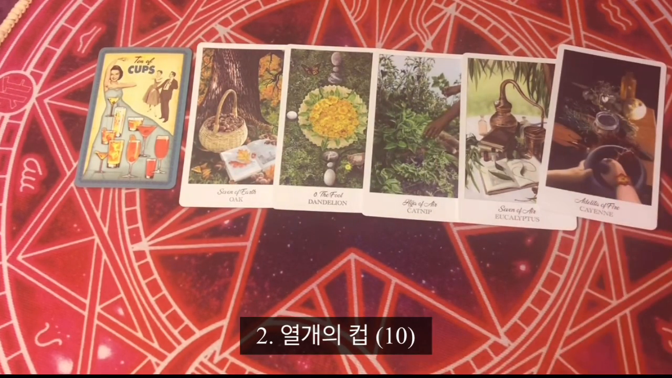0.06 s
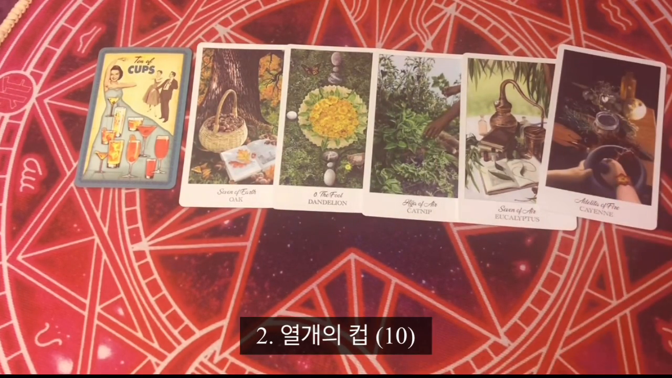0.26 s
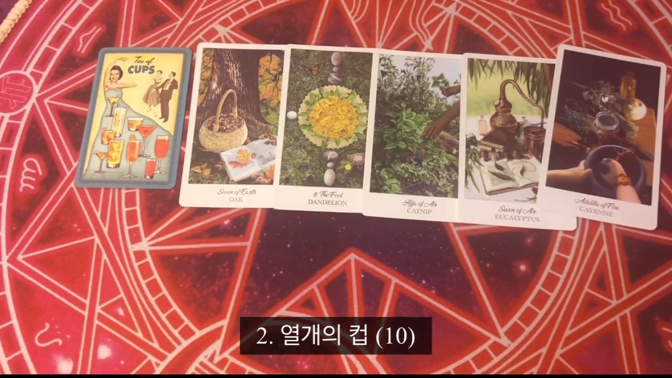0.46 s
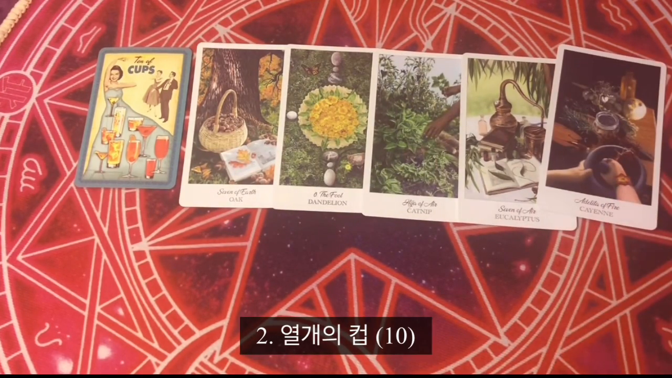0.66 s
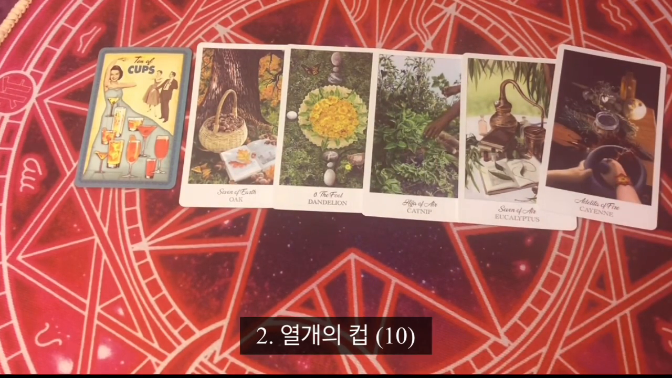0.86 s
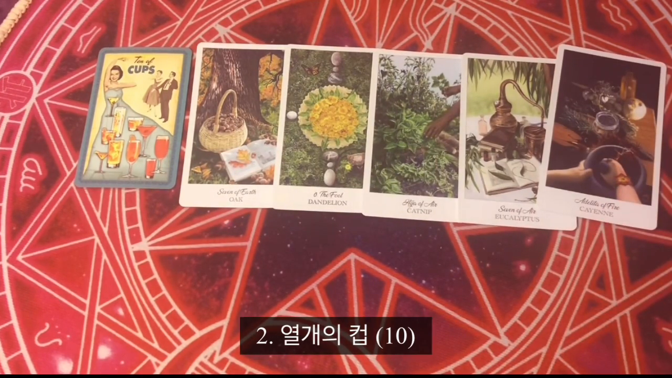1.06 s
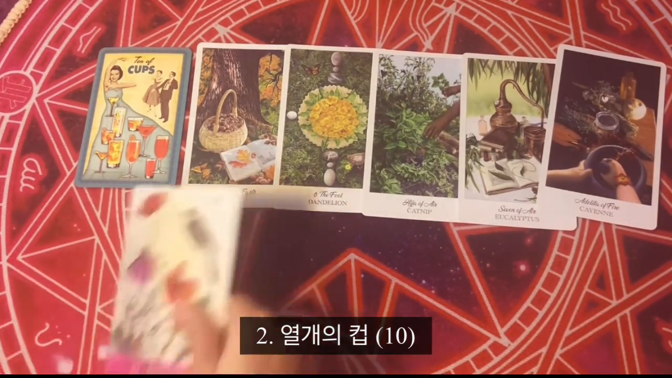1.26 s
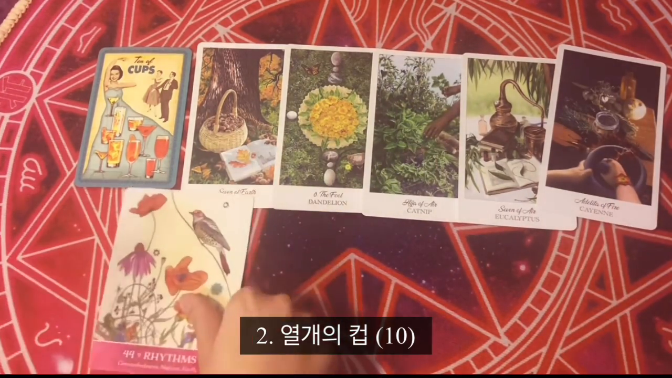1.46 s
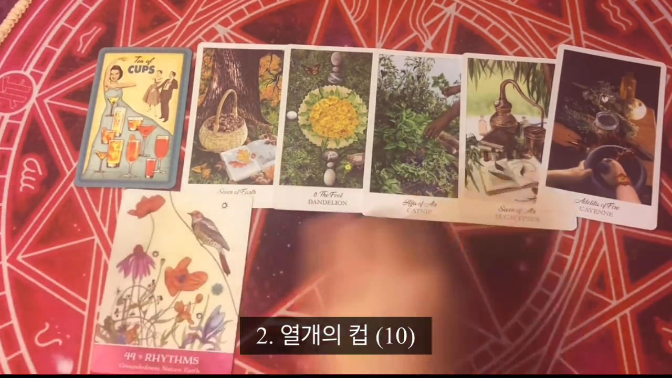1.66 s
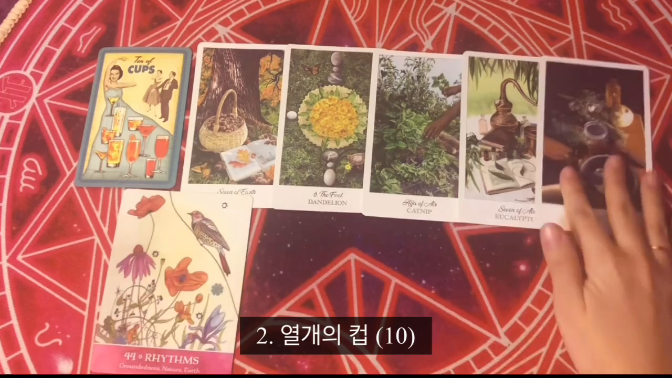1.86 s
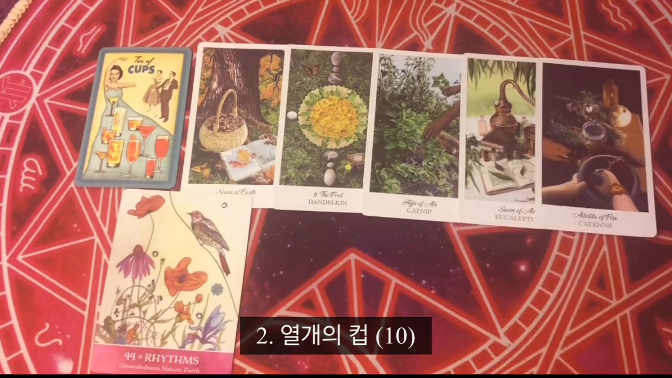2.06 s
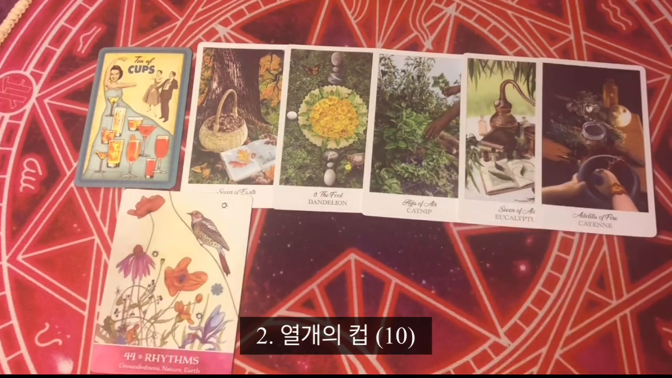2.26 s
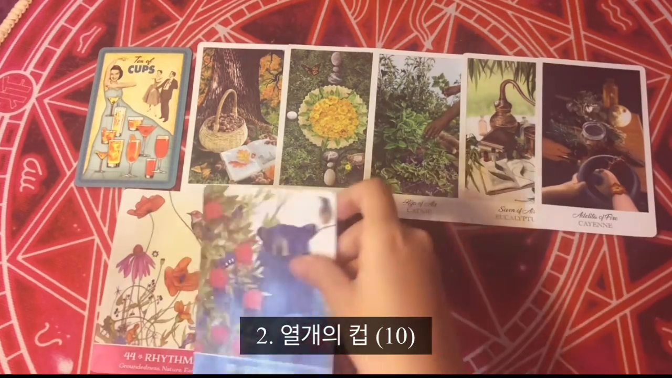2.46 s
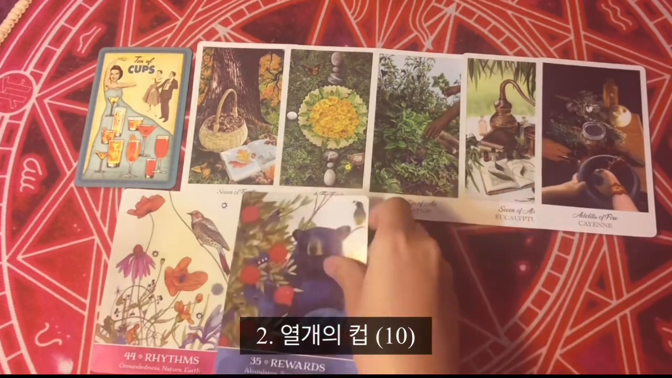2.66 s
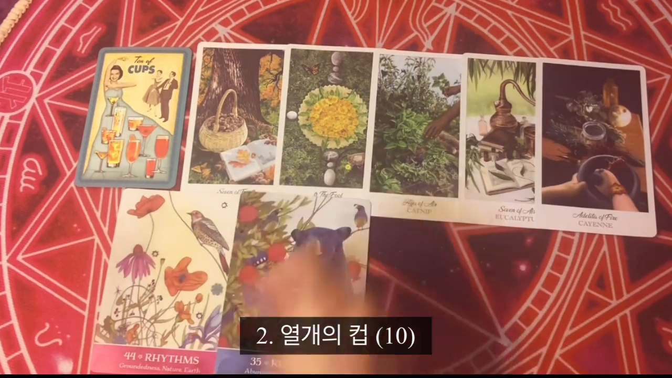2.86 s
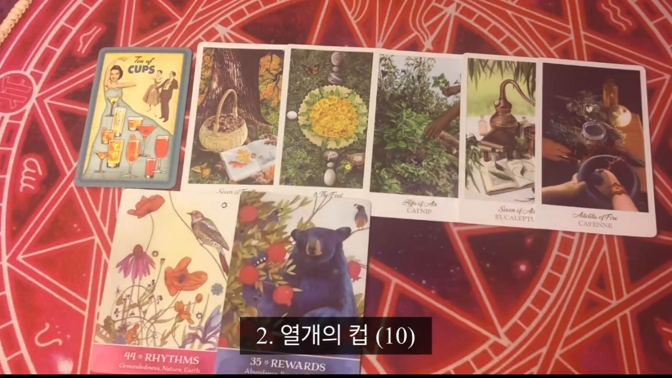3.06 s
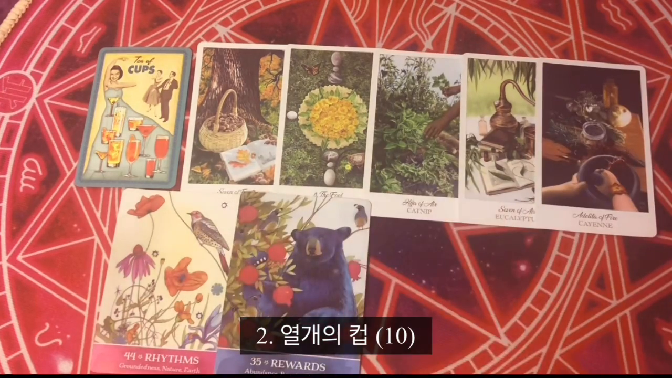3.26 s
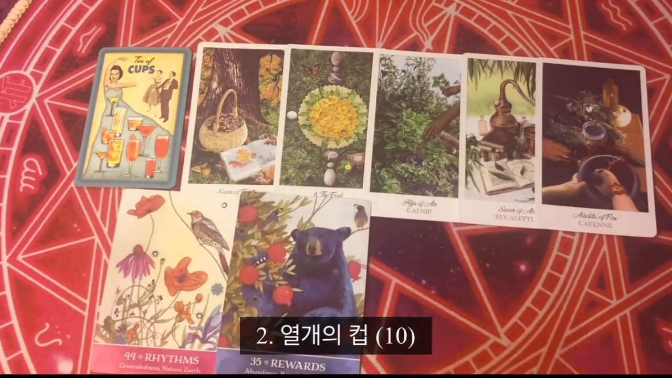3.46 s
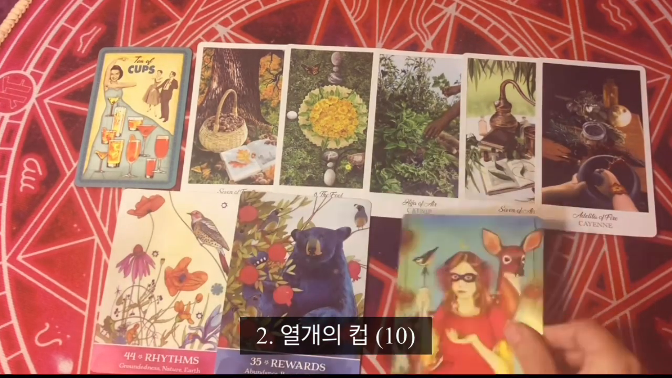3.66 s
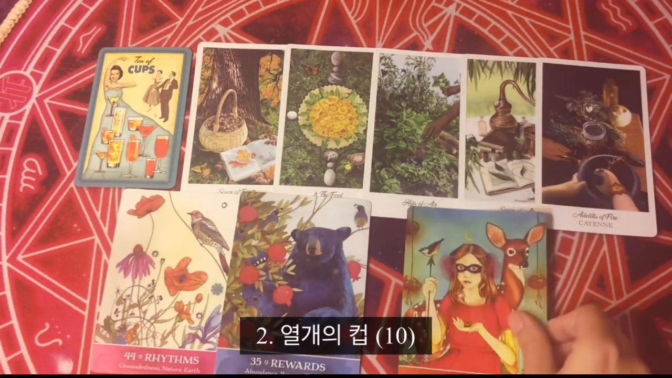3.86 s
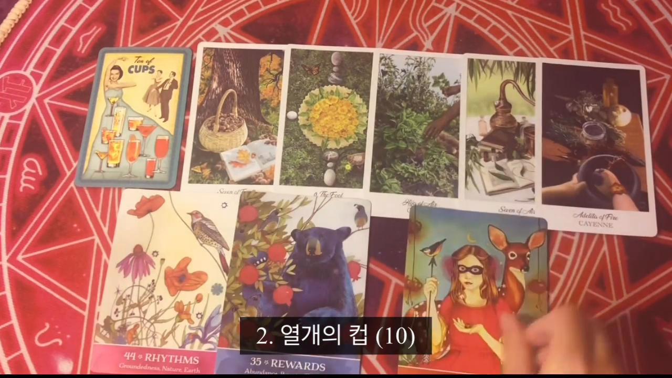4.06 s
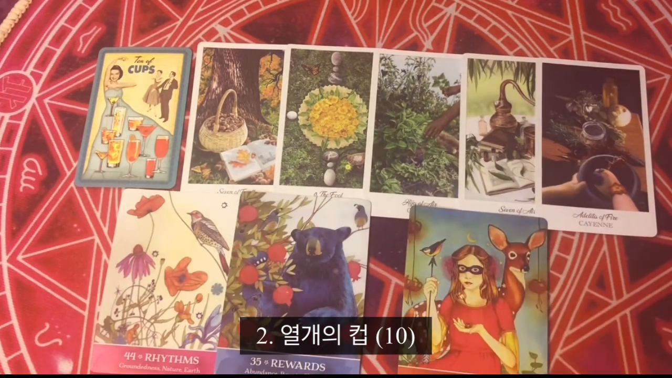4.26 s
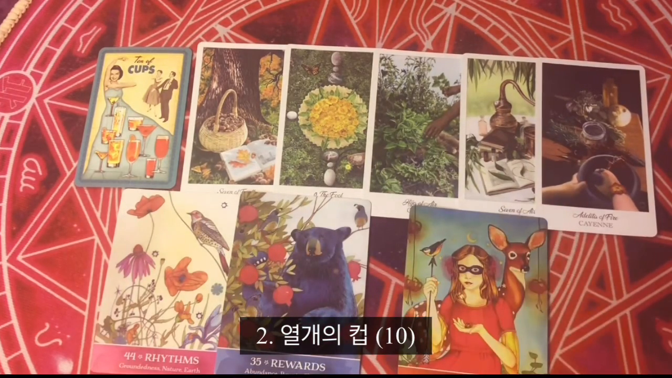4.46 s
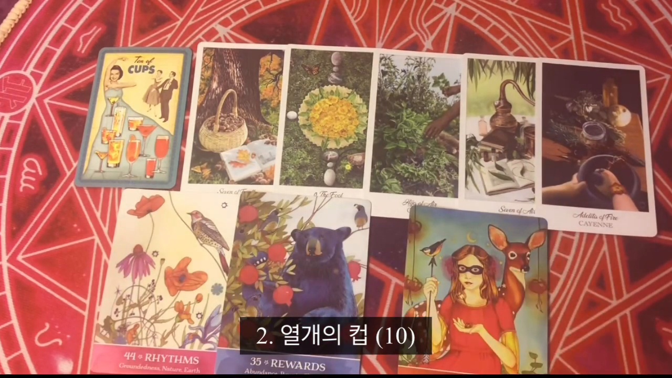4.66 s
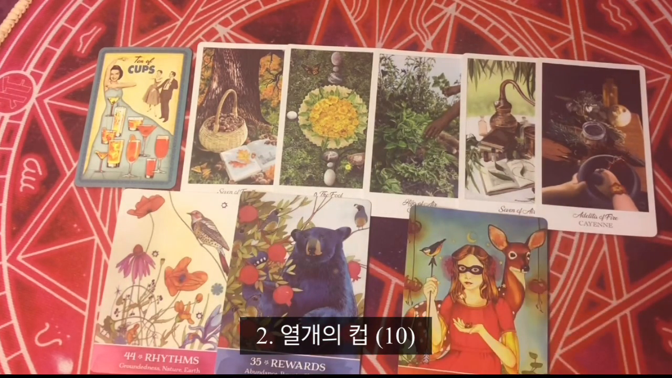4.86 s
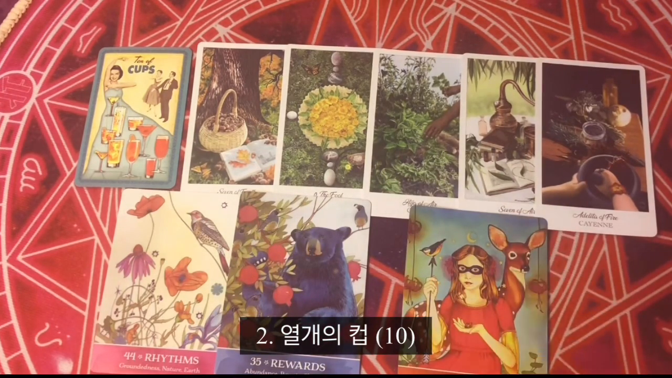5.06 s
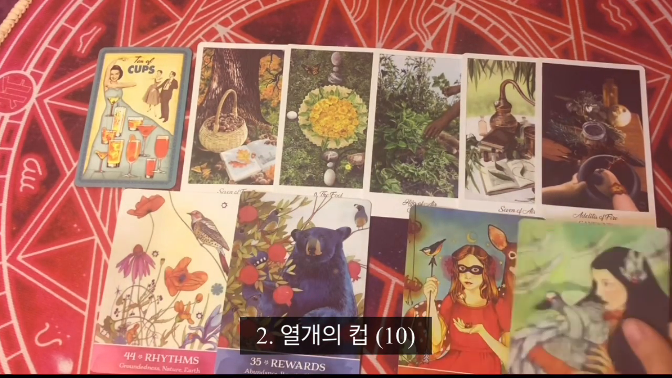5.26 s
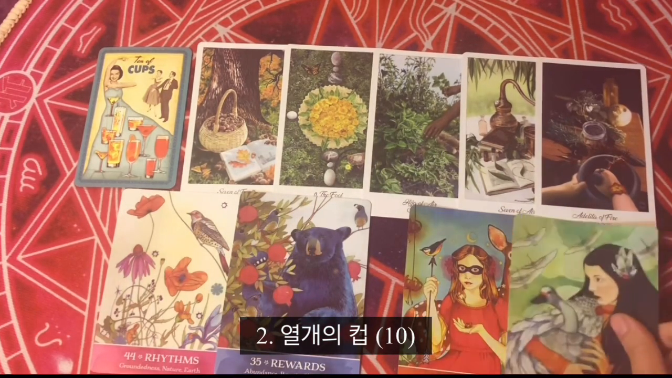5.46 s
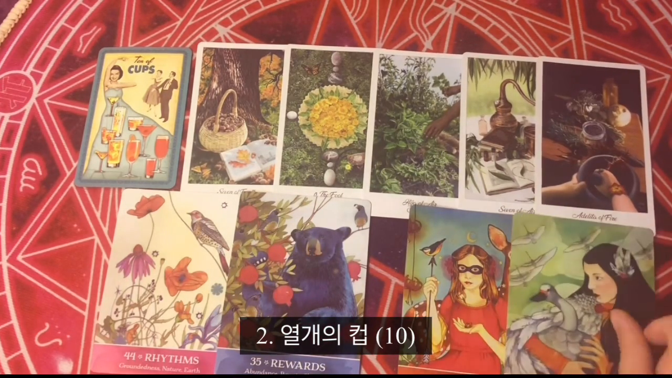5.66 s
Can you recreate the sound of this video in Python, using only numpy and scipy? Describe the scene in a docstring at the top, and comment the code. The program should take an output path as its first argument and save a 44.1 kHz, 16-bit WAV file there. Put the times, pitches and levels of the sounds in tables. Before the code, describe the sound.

Close, dry card handling in a small quiet room: irregular slaps of card stock, sliding rustle, edge flicks and fingers rubbing.

```python
"""Large cards land one by one on a cloth-covered table, close by: the sheet rings briefly, the table knocks.
Between landings, card hisses over card (grainy filtered noise), edges tick in the hand (rung resonances),
fingers rub softly, the coating squeaks (unsteady tones) and the hand bumps the table (low sine bursts).
One bowed card creaks and scrapes flat. The room is small and dry, with a low hum and a faint hiss."""
import sys
import numpy as np
from scipy import signal
from scipy.fft import rfft, irfft
from scipy.io import wavfile
from scipy.ndimage import uniform_filter1d

SR = 44100
rng = np.random.default_rng(int(sys.argv[2]) if len(sys.argv) > 2 else 0)


def unload_wav(signal):
    """Save mono or channel-first audio to the path in sys.argv[1] as 16-bit WAV at rate SR, clipped to [-1, 1]."""
    wavfile.write(
        sys.argv[1],
        SR,
        np.round(np.clip(np.atleast_2d(signal).T, -1, 1) * 32767).astype(np.int16),
    )


N = 251811
TIME = np.arange(N) / SR


def amp(db):
    """Decibels to gain."""
    return 10 ** (np.asarray(db) / 20)


def unit(x):
    """Scales to energy 1."""
    return x / np.sqrt(np.sum(x ** 2) + 1e-20)


def evened(x):
    """Scales to rms 1."""
    return unit(x) * np.sqrt(len(x))


def add(mix, s, sound):
    """Mixes a sound in at time s."""
    part = mix[max(round(s * SR), 0):][:len(sound)]
    part += sound[:len(part)]


def band(x, lo_hz, hi_hz, order=2):
    """Causal band-pass."""
    edges_hz = [lo_hz, min(hi_hz, SR / 2 - 1)]
    return signal.sosfilt(signal.butter(order, edges_hz, "band", fs=SR, output="sos"), x)


def ring(x, hz, width_hz):
    """One-pole complex resonance; hz is fixed or a curve."""
    turn = np.exp(2j * np.pi * np.cumsum(hz * np.ones(len(x))) / SR)
    r = np.exp(-np.pi * width_hz / SR)
    return (turn * signal.lfilter([1 - r], [1, -r], x / turn)).imag


def coloured(x, points):
    """Shapes the spectrum of an N-sample noise, at rms 1."""
    hz, db = np.transpose(points)
    bins_hz = np.fft.rfftfreq(N, 1 / SR)
    gain = amp(np.interp(np.log(bins_hz + 1), np.log(hz), db))
    return evened(irfft(rfft(x) * gain, N))


def wobble(length, size):
    """Random curve of rms 1, smoothed twice over size samples."""
    return evened(uniform_filter1d(uniform_filter1d(rng.standard_normal(length), size), size))


def swell(t, rise, fall):
    """Exponential growth up to t = 0, then decay; time constants in seconds."""
    return np.exp(np.where(t < 0, t / max(rise, 1e-5), -t / max(fall, 1e-5)))


def decaying_sine(t, hz, t60):
    """A mode struck at t = 0, falling 60 dB in t60 seconds."""
    return amp(-60 * t / t60) * np.sin(2 * np.pi * hz * t)


def background():
    """Steady air whose low part swells a little, and a wavering hum of noise-driven resonances."""
    # Room air colour. Each row: frequency in Hz, relative level in dB per Hz.
    air_colour = [(25, 4.5), (50, -8), (68, -10), (95, -0.5), (125, -2), (160, -3), (230, 2), (330, -6.5),
                  (480, -7.5), (700, -9), (1000, -13), (2500, -22.5), (6000, -27.5), (15800, -29.5)]
    # Hum lines. Each row: frequency in Hz, nominal width in Hz, level in dB.
    hum_lines = [(85.4, 4.4, -58), (170.4, 2.03, -63.5), (221, 12.5, -68.5)]
    air_db = -55.5
    air = amp(air_db) * coloured(rng.standard_normal(N), air_colour)
    low = signal.sosfiltfilt(signal.butter(2, 900, fs=SR, output="sos"), air)
    out = air + low * (amp(0.94 * wobble(N, size=3500)) - 1)
    for hz, width_hz, db in hum_lines:
        # two resonances in series, each twice as wide
        wavering = ring(ring(rng.standard_normal(N), hz, 2 * width_hz), hz, 2 * width_hz)
        out += amp(db) * evened(band(wavering, 0.853 * hz, 1.283 * hz))
    return out


def handling():
    """Strength of the fingers' rubbing: each hold sets in, stays and dies away over a resting level."""
    # Fingers hold and shift a card. Each row: start in seconds, length in seconds, level in dB.
    holds = [(0.198, 0.085, -74), (0.704, 0.057, -71), (2.004, 0.17, -73.5), (2.356, 0.1, -64),
             (2.71, 0.65, -76.5), (3.566, 0.44, -71.5), (4.254, 0.1, -66.5), (4.623, 0.45, -73.5),
             (5.023, .36, -66.5)]
    grip_s, let_go_s, resting_db = 0.031, 0.038, -85.5
    level = amp(resting_db) * np.ones(N)
    for start, length, db in holds:
        level += amp(db) * swell(TIME - np.clip(TIME, start, start + length), grip_s, let_go_s)
    return level


def flecks(lo_hz, hi_hz, per_s=700, spread_db=4.0, width_hz=150, count=12):
    """Tiny catches of the card's edge, each ringing one mode of the sheet."""
    out = np.zeros(N)
    for hz in np.geomspace(lo_hz, hi_hz, count):
        happens = rng.random(N) < per_s / count / SR
        catches = happens * amp(spread_db * np.minimum(rng.exponential(1, N), 3))
        out += ring(catches, hz * rng.uniform(0.93, 1.04), width_hz)
    return evened(band(out, 0.6 * lo_hz, 1.7 * hi_hz))


def slides():
    """Card rubs on card: grainy hiss and fizz from the surfaces, lower rustle and crackle from the sheet."""
    # Each row: time of fastest motion in seconds, hiss level in dB, brightness in dB,
    # speeding-up time constant in seconds, nominal slowing-down time constant in seconds.
    slide_moves = [(.781, -55, 4, 0.0079, .006), (.89, -63, 10, 0.026, .035),
                   (0.975, -41.5, 11, 0.02, 0.031), (.996, -42, 30, 0.0022, 0.0029),
                   (1.151, -59.5, -10.5, 0.0043, 0.053), (1.335, -60.5, -5.5, 0.056, 0.09),
                   (1.689, -62.5, -3.5, 0.0094, 0.097), (1.92, -63, 5, .016, .024),
                   (2.133, -52.5, 15, 0.0073, 0.013), (2.176, -54.5, -5.5, .016, 0.023),
                   (2.55, -69.5, -12, 0.067, 0.09), (2.655, -54, -6.5, 0.026, 0.014),
                   (2.887, -59.5, -1.5, 0.0097, 0.01), (3.033, -62.5, 2, 0.015, 0.029),
                   (3.206, -47, 8, 0.017, .018), (3.49, -66, -10.5, 0.017, 0.071),
                   (4.299, -58, 9, 0.017, 0.011), (4.325, -60.5, 17, 0.0087, 0.0096),
                   (4.346, -61, -2, 0.015, 0.099), (4.62, -54, 1, 0.0066, 0.019),
                   (4.673, -52, -0.5, 0.0085, 0.0082), (5.181, -64.5, -14.5, 0.021, .01),
                   (5.441, -55, -14.5, 0.015, 0.014)]
    # Colours of the sheet, its surface and its finest fibres.
    # Each row: frequency in Hz, relative level in dB per Hz.
    sheet_colour = [(300, -2), (900, -3.5), (1500, -3), (2200, 0.5), (3300, -2.5), (4500, -20), (8000, -14),
                    (16000, -48)]
    surface_colour = [(500, -25), (2000, -8), (4000, 3), (6000, 1.5), (8500, -11), (11000, -3),
                      (16000, -11)]
    fizz_colour = [(2000, -41), (7000, -3.5), (9500, -1), (12000, -5), (15000, -2.5), (16500, -9)]
    # a bright slide trades rustle for fizz (dB per dB of brightness)
    sheet_loss, fizz_gain, fizz_db = 0.79, 0.42, -1.5
    levels = np.zeros((3, N))
    for s, db, bright_db, rise, fall in slide_moves:
        # friction brings the card to rest
        stopping = np.exp(-(np.maximum(TIME - s, 0) / (2.3 * max(fall, .001))) ** 2)
        layers = amp([[db - sheet_loss * bright_db], [db], [db + fizz_db + fizz_gain * bright_db]])
        levels += layers * swell(TIME - s, rise, fall) * stopping
    rubbing = handling()
    # fibres catch and slip
    catch = amp(2.0 * wobble(N, size=200) + 1.9 * wobble(N, size=14))
    sheet = coloured(catch * rng.standard_normal(N), sheet_colour)
    hiss = coloured(catch * rng.standard_normal(N), surface_colour)
    fizz = coloured(catch * rng.standard_normal(N), fizz_colour)
    sheet = evened(sheet + 1.2 * flecks(1390, 3880, per_s=420))
    hiss = evened(hiss + 0.66 * flecks(4010, 8680, per_s=550))
    out = sheet * (levels[0] + rubbing)
    out += hiss * (levels[1] + 0.61 * rubbing)
    return out + fizz * (levels[2] + .5 * rubbing)


def tap(low_hz, low_db, high_hz, high_db, bite_db, crack_db, grit_db, knock_hz, knock_db, drag):
    """A card's edge drags over fibres and lets go; the sheet rings for a few cycles and pushes on the table."""
    # Higher card modes, the crack. Each row: multiple of high bending mode, width in Hz, relative level in dB.
    overtones = [(2.1, 260, -1), (2.45, 304, 1.5), (2.85, 347, 0.5), (3.3, 400, 0)]
    # Table modes, wherever it is struck. Each row: frequency in Hz, relative level in dB, t60 in seconds.
    table_modes = [(287.5, -2, 0.1), (400, -3, 0.051), (542, 1.5, 0.031), (648, -1.5, 0.048),
                   (917, -16.5, 0.035)]
    t = (np.arange(SR // 4) - SR // 100) / SR
    release, after = 1. * (t == 0), np.maximum(t, 0)
    # a gritty contact scrapes before it lets go; a dull one lands at once and rattles afterwards
    lead_share = np.clip((grit_db - high_db + 22.5) / 18, .12, 1.2)
    fibres = rng.standard_normal(len(t)) * amp(1.26 * wobble(len(t), size=12))
    dragging = swell(t, 1.78 * drag * lead_share, 1.6 * drag)
    dragging += 0.017 * swell(t, 0.0029 * lead_share, 0.0017)
    scrape = unit(fibres * dragging)
    drive = release + scrape * min(drag / 0.00042, .9 + 1.2 * lead_share)

    bend = amp(low_db) * unit(band(ring(drive, low_hz, 226), 620, 2140))
    bend += amp(high_db) * unit(band(ring(drive, high_hz, 247), 1270, 3400))
    bite_hz = 3150 * rng.uniform(0.89, 0.996)
    bite = amp(bite_db) * unit(band(ring(drive, bite_hz, 400), 2970, 4060))
    higher = sum(amp(db) * ring(drive, high_hz * ratio, width_hz) for ratio, width_hz, db in overtones)
    crack = amp(crack_db) * unit(band(unit(higher) + 0.065 * unit(drive), 4500, 9000))
    grit = amp(grit_db) * unit(band(scrape + 0.43 * release, 5040, 14900))

    # the table knocks, favouring one pitch at the spot that is struck
    spot = unit(decaying_sine(after, knock_hz, t60=0.052))
    board = unit(sum(amp(db) * decaying_sine(after, hz, t60) for hz, db, t60 in table_modes))
    knock = amp(knock_db) * unit(spot + 0.86 * board)
    # the whole table top rings on, the more the harder it is pushed
    push = amp(knock_db - 14.0) + amp(low_db - 15.5)
    top = push * unit(decaying_sine(after, 222, t60=.2))
    return t[0], bend + bite + crack + grit + knock + top


def touch(s, db, bright_db, grit_db, low_hz, high_hz, knock_db, knock_hz, drag, voice):
    """One contact: strength lifts the card's modes together, brightness tilts them by the voice's slopes."""
    low_db, high_db, bite_db, crack_db = (db + offset + slope * bright_db for offset, slope in voice)
    lead, sound = tap(low_hz, low_db, high_hz, high_db, bite_db, crack_db, grit_db, knock_hz, knock_db, drag)
    return s + lead, sound


def tick(s, db, bright_db, hz, drag):
    """A contact held off the table: low mode a fixed share of the high one, little reaching the cloth."""
    # Rows low bend, high bend, bite, crack. Each row: dB against strength, dB per dB of brightness.
    tick_voice = [(-3.5, 0.081), (.5, 0), (-3.5, 0.38), (-8.5, 1)]
    low_ratio, knock_rel_db, knock_hz = .68, -13, 370
    grit_rel_db, grit_slope = -10, 1.03  # dB against strength, dB per dB of brightness
    grit_db = db + grit_rel_db + grit_slope * bright_db
    return touch(s, db, bright_db, grit_db, low_ratio * hz, hz, db + knock_rel_db, knock_hz, drag, tick_voice)


def strays(count=40):
    """Faint ticks at random times, stronger the harder the fingers rub."""
    peak_db, spread_db, bright_db = -35.5, 2.5, 3  # peak_db at the hardest rubbing, mid spread
    centre_hz, drag_s = 2050, .0012
    out, rubbing = np.zeros(N), handling()
    for place, size, pitch in rng.random((count, 3)):
        at = int(place * N)
        db = peak_db + spread_db * (2 * size - 1) + 20 * np.log10(rubbing[at] / rubbing.max())
        hz = centre_hz * 2 ** ((pitch - .5) / 2)
        add(out, *tick(at / SR, db, bright_db, hz, drag_s))
    return out


def landings():
    """Cards land: the edge drags and lets go, the sheet rings and knocks the table."""
    # Each row: time in seconds, strength in dB, brightness in dB, edge grit in dB, low bending mode in Hz,
    # high bending mode in Hz, knock level in dB, knock pitch in Hz, nominal edge drag in seconds.
    landing_rows = [(.189, -27, 6, -31, 875, 1670, -16, 777, 0.0015),
                    (0.1935, -27, -4, -44, 1420, 1680, -20.5, 660, 0.0059),
                    (1.141, -17.5, -6, -41, 1060, 1980, -20.5, 403, .0034),
                    (1.1525, -30, -3, -46, 1023, 2120, -30, 364, 0.0024),
                    (1.3687, -9.5, -2, -16, 1110, 1830, -15.5, 604, 0.0014),
                    (2.1734, -25.5, 9, -30, 1290, 2500, -20.5, 300, .0009),
                    (2.3346, -10.5, 5.5, -20, 1460, 2400, -16.5, 680, 0.00065),
                    (2.3378, -12.5, -7, -27, 1060, 1910, -15, 374, 0.00047),
                    (2.5781, -14, 7.5, -23.5, 1120, 1840, -31, 315, .0012),
                    (2.6338, -3.5, 6.5, -5, 1100, 2180, -13.5, 405, .0009),
                    (2.6353, -8.5, -6, -22, 1330, 2360, -23, 850, .00065),
                    (3.416, -30, 2.5, -42, 1130, 1870, -24, 680, 0.0028),
                    (3.459, -14, -7, -43, 1130, 2420, -12, 380, 0.0012),
                    (3.4653, -19.5, -15, -50, 1240, 1770, -14.5, 608, 0.0042),
                    (3.845, 6.5, 2, -10, 1800, 1944, -16, 481, .0005),
                    (3.8474, -5.5, -6, -14, 1620, 1820, -20.5, 460, 0.00068),
                    (5.086, -20.5, 5, -29, 1310, 1650, -25.5, 450, 0.0011),
                    (5.1104, -21.5, -7, -46, 1238, 1790, -15.5, 565, 0.005),
                    (5.427, -6, 3.5, -8, 1820, 1720, -7.5, 725, 0.00071),
                    (5.4354, -18, 9, -16, 1310, 2030, -10, 653, 0.0016)]
    # Rows low bend, high bend, bite, crack. Each row: dB against strength, dB per dB of brightness.
    landing_voice = [(-1.5, -0.11), (1, 0), (-6.5, 0.66), (-9, 0.92)]
    out = np.zeros(N)
    for row in landing_rows:
        add(out, *touch(*row, landing_voice))
    return out


def ticks():
    """A card's edge flicks off a finger or another card and rings the sheet."""
    # Each row: time in seconds, strength in dB, brightness in dB, high bending mode in Hz,
    # nominal edge drag in seconds.
    tick_rows = [(0.253, -40, 8, 1965, .002), (0.333, -40.5, 13, 1860, 0.0009),
                 (0.7011, -36, 14.5, 2300, 0.001), (0.9944, -17, -7, 2440, 0.0038),
                 (1.173, -32, -9, 2143, .0026), (1.215, -21.5, -6.5, 2110, 0.0049),
                 (1.4365, -22.5, 2, 1900, 0.0006), (2.097, -33, 12, 1770, 0.0017),
                 (2.323, -27, 1, 2304, 0.0022), (2.395, -27, -6, 2100, 0.0025),
                 (2.4274, -16.5, -7, 2220, 0.0024), (2.506, -25.5, -1, 1810, 0.0048),
                 (3.5204, -30.5, -10, 2300, .0018), (3.5996, -28.5, -1, 2260, 0.0023),
                 (3.6873, -30, 2, 2380, 0.00047), (3.716, -25, -2, 2700, 0.0033),
                 (3.9361, -20.5, 1, 2020, 0.00068), (4.132, -32.5, 4.5, 2530, .002),
                 (4.3413, -36.5, 15, 1670, .0012), (4.7707, -43, 14.5, 1720, 0.0011),
                 (4.873, -36.5, 13, 1720, 0.00062), (4.9004, -34, 9, 2520, .0024),
                 (4.9703, -45, 19, 2430, 0.0025), (5.003, -32, 8, 2700, .0024),
                 (5.142, -23, 2.5, 1800, 0.0014), (5.2272, -24.5, -6.5, 1810, 0.0018),
                 (5.2894, -23, 6, 1780, 0.00073), (5.3071, -21.5, 5, 1841, 0.0023),
                 (5.405, -21, 4.5, 1710, 0.012), (5.537, -29.5, 6, 1760, 0.0036)]
    out = np.zeros(N)
    for row in tick_rows:
        add(out, *tick(*row))
    return out


def bumps():
    """The heel of the hand sets the table's lowest mode going: soft sine bursts."""
    # Each row: centre time in seconds, peak level in dB, frequency in Hz, length in seconds.
    bump_rows = [(2.027, -50, 119, 0.078), (3.402, -44, 82.4, .1), (4.971, -47.5, 120.7, 0.11),
                 (5.188, -46, 113.7, 0.17)]
    out = np.zeros(N)
    for s, db, hz, length in bump_rows:
        t = np.arange(round(length * SR)) / SR
        tone = np.sin(2 * np.pi * (hz * t + rng.random()))
        add(out, s - length / 2, amp(db) * np.hanning(len(t)) * tone)
    return out


def settle(s=3.848, db=-40.5, start_hz=2450, end_hz=1600, fade=0.025, rub_db=-3, low_db=-5, creak_db=-33):
    """The most bowed card creaks just before it snaps, then flattens with a scrape of falling pitch."""
    t = np.arange(SR // 8) / SR
    hz = np.interp(t, [0, .052], [start_hz, end_hz])
    upper = evened(band(ring(rng.standard_normal(len(t)), hz, 294), 960, 4050))
    lower = evened(band(ring(rng.standard_normal(len(t)), 1380, 260), 810, 2200))
    rub = evened(band(band(rng.standard_normal(len(t)), 1200, 4300, order=1), 670, 7400))
    scrape = upper + amp(low_db) * lower + amp(rub_db) * rub
    motion_left = np.interp(t, [.044, .062], [1, 0])
    out = np.zeros(N)
    add(out, s - .0095, amp(creak_db) * rub[::-1] * swell(t - .0055, 0.0043, 0.002))
    add(out, s, amp(db) * scrape * swell(t - .008, .006, fade) * motion_left)
    return out


def squeaks(wander_hz=110, octave=0.69):
    """Brief stick-slip of the coating as a card leaves the deck: an unsteady tone and its octave."""
    # Each row: peak time in seconds, nominal level in dB, mean frequency in Hz, fade time constant in seconds.
    squeak_rows = [(4.342, -45.5, 2920, 0.004), (4.366, -62, 2900, .008), (4.389, -58, 2830, 0.011),
                   (4.677, -54, 3310, 0.0072)]
    t, out = np.arange(SR // 8) / SR, np.zeros(N)
    for s, db, hz, fade in squeak_rows:
        phase = 2 * np.pi * np.cumsum(hz + wander_hz * wobble(len(t), size=30)) / SR
        tone = np.sin(phase) + octave * np.sin(2 * phase)
        tone *= amp(3.3 * wobble(len(t), size=90))
        add(out, s - 1 / 50, amp(db) * tone * swell(t - 1 / 50, .003, fade))
    return out


def room(x):
    """A few near reflections, then sparse echoes, each band dying at its own speed."""
    # Reverberation bands. Each row: low edge in Hz, high edge in Hz, t60 in seconds, level in dB.
    reverb_bands = [(130, 450, 0.18, -6), (683, 2440, .13, -11), (3150, 11000, 0.11, -13.5)]
    # First reflections from things near the table. Each row: delay in seconds, linear gain.
    near_echoes = [(.0031, 0.099), (.0068, 0.038)]
    t = np.arange(SR // 2) / SR
    echoes = rng.standard_normal(len(t)) * (rng.random(len(t)) < 2500 / SR) * (t > .004)
    tail = np.zeros(len(t))
    for lo, hi, t60, db in reverb_bands:
        width_gain = np.sqrt(2 * abs(hi - lo) / SR)
        tail += amp(db) * width_gain * unit(band(echoes, lo, hi) * amp(-60 * t / t60))
    for delay, gain in near_echoes:
        add(tail, delay, np.array([gain]))
    return x + signal.fftconvolve(x, tail)[:N]


def scene():
    """Cards in the room, with the hand's bumps and the background added dry."""
    cards = landings() + ticks() + strays() + settle() + slides() + squeaks()
    return (room(cards) + bumps() + background())[None]


def record(dry):
    """The microphone's low cut and the recorder's band limit."""
    low_cut_hz, edge_hz = 70, 16050
    thinned = signal.sosfilt(signal.butter(5, low_cut_hz, "high", fs=SR, output="sos"), dry)
    limit = signal.firwin(511, edge_hz, window=("kaiser", 9), fs=SR)
    return signal.oaconvolve(thinned, limit[None], "same")


dry = scene()
out = record(dry)
unload_wav(out)
```